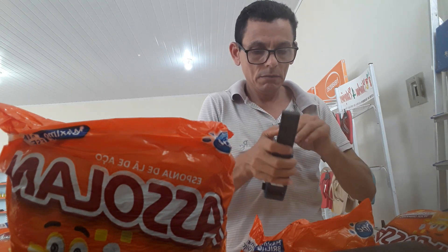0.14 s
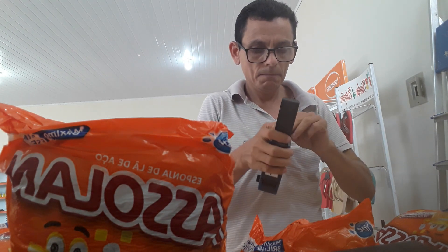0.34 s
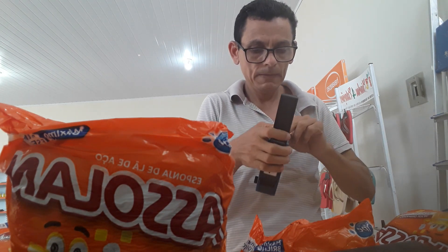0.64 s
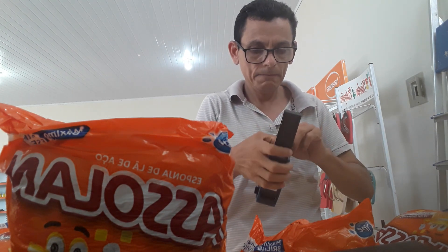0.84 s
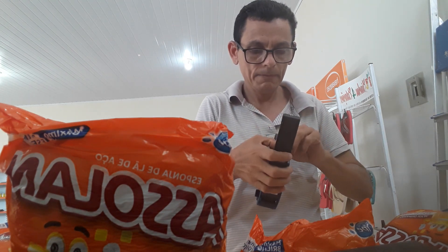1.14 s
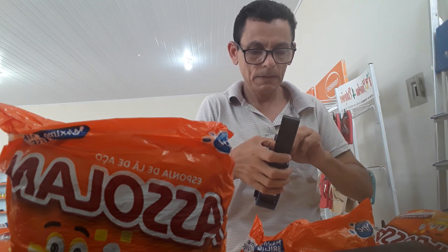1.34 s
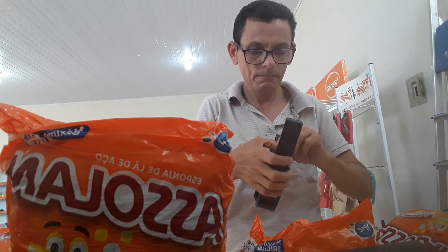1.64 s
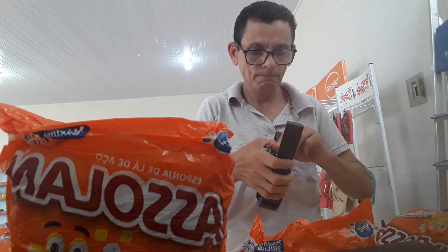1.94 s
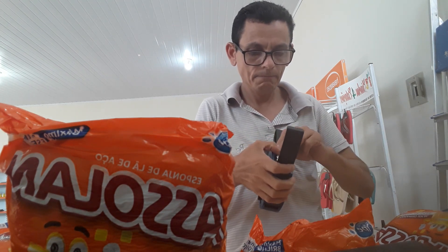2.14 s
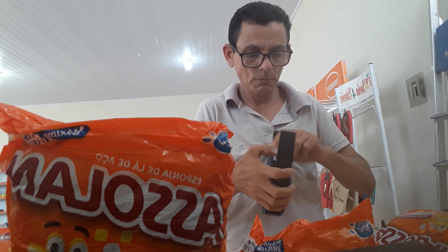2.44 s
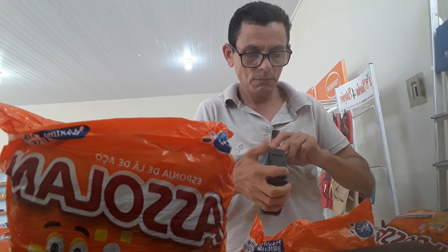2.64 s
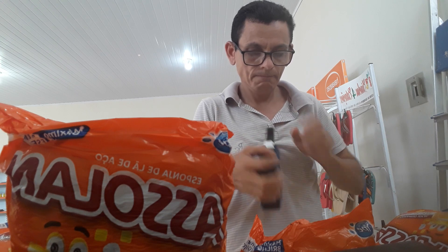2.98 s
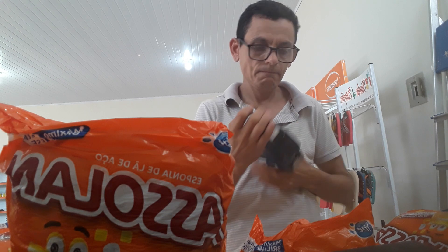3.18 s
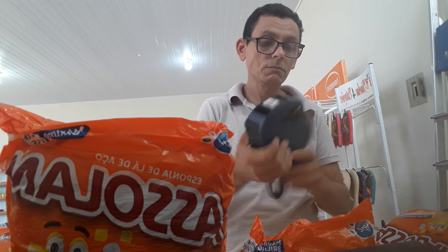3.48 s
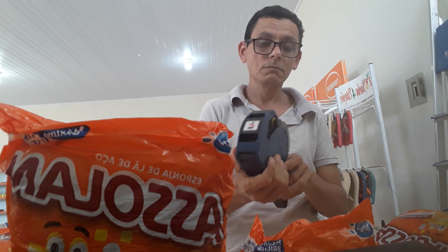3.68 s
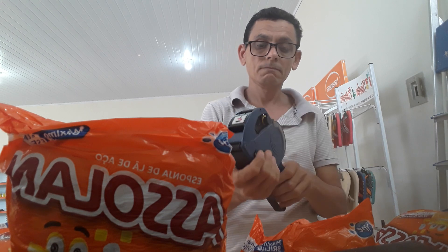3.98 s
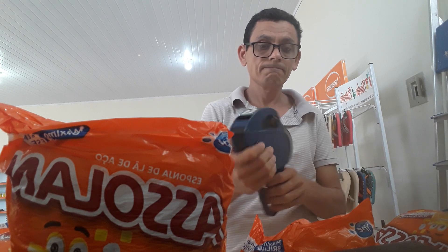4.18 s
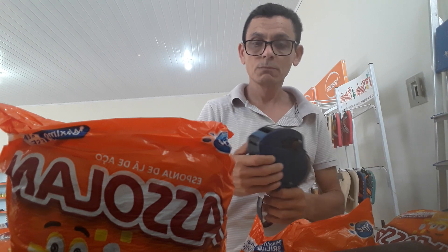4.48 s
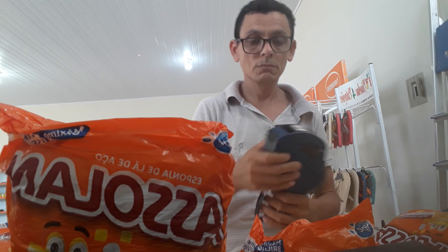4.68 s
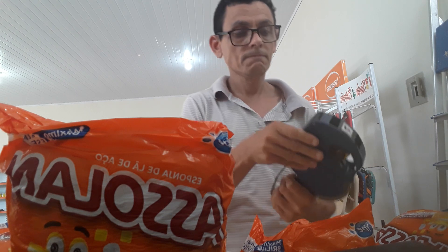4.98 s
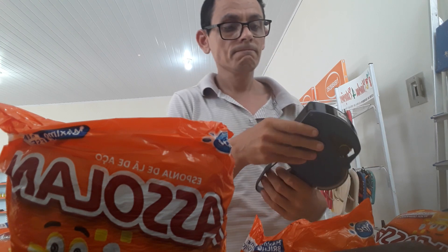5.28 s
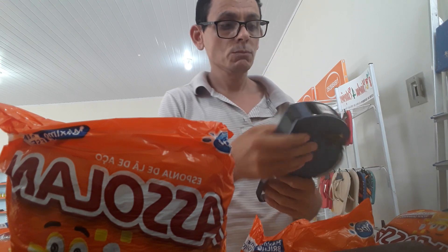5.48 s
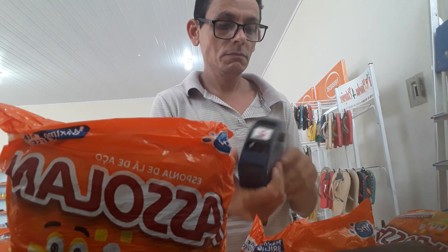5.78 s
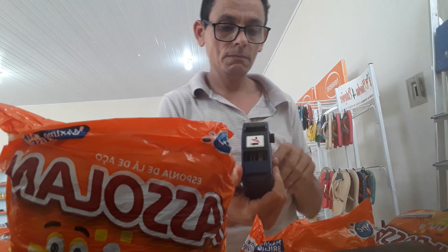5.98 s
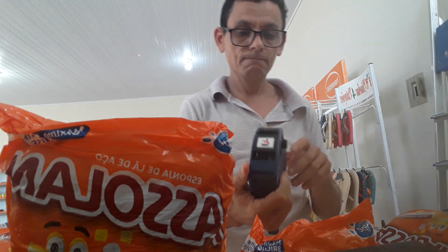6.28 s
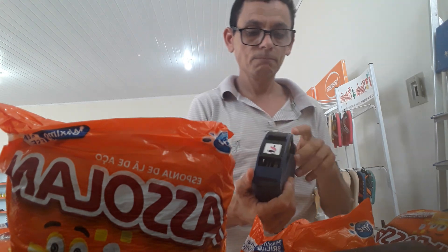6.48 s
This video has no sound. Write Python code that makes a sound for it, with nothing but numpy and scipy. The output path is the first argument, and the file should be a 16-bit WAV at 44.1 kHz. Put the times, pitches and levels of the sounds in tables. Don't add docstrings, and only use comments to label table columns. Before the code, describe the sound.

Small plastic clicks and scrapes, a hard cover slam, a sharp trigger clack and spring-back, over street rumble, sparrows and a nearing vehicle.

```python
import sys
import numpy as np
from scipy import signal
from scipy.fft import rfft, irfft, next_fast_len
from scipy.io import wavfile
from scipy.ndimage import uniform_filter1d, map_coordinates

SR = 44100
rng = np.random.default_rng(int(sys.argv[2]) if len(sys.argv) > 2 else 0)


def materialize(psi):
    bounded = np.clip(np.atleast_2d(psi).T, -1, 1)
    quanta = np.round(bounded * 32767).astype(np.int16)
    wavfile.write(sys.argv[1], SR, quanta)


def invert_db(x):
    u = np.asarray(x, float) / 20
    return 10 ** u


N = 292030


def unit(x):
    return x / np.sqrt(np.mean(x ** 2) + 1e-20)


def along(points, hz):
    f, v = np.transpose(points)
    return np.interp(np.log(hz + 1), np.log(f + 1), v)


def curves(rows):
    s, *cols = np.transpose(rows)
    return [np.interp(np.arange(N) / SR, s, c) for c in cols]


def wobble(rate_hz):
    knots = rng.standard_normal(int(N * rate_hz / SR) + 4)
    return map_coordinates(knots, [np.arange(N) * rate_hz / SR])


def filtered(x, response):
    m = next_fast_len(len(x) + 4096)
    spectrum = rfft(x, m) * response(np.fft.rfftfreq(m, 1 / SR))
    return irfft(spectrum, m)[:len(x)]


def resonances(modes):
    def response(f):
        total = 0
        for k, (hz, width_hz, db) in enumerate(modes):
            damping = 1j * f * width_hz
            total = total + (-1) ** k * invert_db(db) * damping / (hz * hz - f * f + damping)
        return total
    return response


def steep(modes):
    return lambda f: resonances(modes)(f) ** 2


def damped(modes):
    return lambda f: resonances(modes)(f) / (1 + 1j * f / 9000) ** 2


def rush(spectrum, patchy_db):
    z = signal.stft(rng.standard_normal(N), nperseg=512)[2]
    field = uniform_filter1d(rng.standard_normal(z.shape), size=5, axis=0)
    field = uniform_filter1d(field, size=14, axis=1)
    x = signal.istft(z * invert_db(patchy_db * unit(field)), nperseg=512)[1][:N]
    return unit(filtered(x, lambda hz: invert_db(along(spectrum, hz))))


def swells(table, attack, release, fade_db):
    rows = []
    for start_s, long_s, first_hz, last_hz, db in table:
        end_s = start_s + long_s
        rows.append((start_s - 0.004, first_hz, -120))
        for share, drop_db in [(0, fade_db), (attack, 0), (1 - release, 0), (1, fade_db)]:
            rows.append((start_s + share * long_s, first_hz + share * (last_hz - first_hz), db - drop_db))
        rows.append((end_s + 0.004, last_hz, -120))
    return rows


def tone(rows, blur_hz, rate_hz):
    hz, db = curves(rows)
    phase = 2 * np.pi * np.cumsum(hz + blur_hz * wobble(rate_hz)) / SR
    return np.sqrt(2) * invert_db(db), phase


# time in seconds, swell in dB.
TRAFFIC_SWELL = [(0, 2), (.25, 3), (.6, 2), (1.4, 1), (1.65, 1), (1.95, 2), (2.4, 1.5), (2.7, 5), (3.75, 6),
                 (4.45, 7.5), (4.9, 10), (5.4, 11), (5.6, 12.5), (6.2, 15), (6.46, 19), (6.62, 20.5)]
# frequency in Hz, density in dB per Hz.
RUMBLE_SPECTRUM = [(18, -57), (30, -19), (65, -1), (102, -0.5), (172, 0.5), (209, -2), (243, -1.5),
                   (280, -14), (400, -22), (520, -17), (880, -120)]
ROAR_SPECTRUM = [(150, -13), (250, -1), (279, -1.5), (788, -4.5), (1230, -8), (1370, -9.5), (1950, -17),
                 (3500, -18), (4550, -31), (7700, -120)]
HISS_SPECTRUM = [(1470, -5), (2500, 2), (2880, 0), (3630, -4), (3980, -2.5), (6760, -4), (8660, -12.5),
                 (9440, -32.5), (11300, -15), (16000, -40)]
# frequency in Hz, density in dB per Hz.
SPRAY_SPECTRUM = [(6000, -30), (8500, -1), (11500, 0), (14000, -11), (16000, -10)]
# centre in Hz, width in Hz, level in dB.
TREAD_MODES = [(1031, 52, -2), (1254, 78, 0.5), (1678, 145, -5), (2000, 85, -0.5), (2290, 90, -6.5),
               (2950, 90, -9)]


def street():
    swell_db, = curves(TRAFFIC_SWELL)
    rumble_db = -58 + 0.66 * np.minimum(swell_db, 16.5)
    roar_db = -64 + 0.97 * swell_db
    tread_db = -74.5 + 1.697 * swell_db
    hiss_db = -71.5 + swell_db + 0.018 * swell_db ** 2
    spray_db = -118 + 2.9 * swell_db

    rumble = invert_db(rumble_db + 0.8 * wobble(4.8)) * rush(RUMBLE_SPECTRUM, patchy_db=1.57)
    roar = invert_db(roar_db + 0.88 * wobble(8.1)) * rush(ROAR_SPECTRUM, patchy_db=1.97)
    flat = rush([(100, 0), (9000, 0)], patchy_db=0.5)
    tread = invert_db(tread_db) * unit(filtered(flat, resonances(TREAD_MODES)))
    hiss = invert_db(hiss_db) * rush(HISS_SPECTRUM, patchy_db=0.6)
    spray = invert_db(spray_db) * rush(SPRAY_SPECTRUM, patchy_db=1.1)
    return rumble + roar + tread + hiss + spray


# time in seconds (the bump peaks 0.04 s later), peak in dB, pitch in
# Hz.
THUDS = [(.62, -63, 45), (.88, -54, 50), (2.04, -50.5, 60)]


def thuds():
    t = np.arange(N) / SR
    out = np.zeros(N)
    for s, db, hz in THUDS:
        bump = np.exp(-((t - s - 0.04) / 0.054) ** 2)
        out += invert_db(db) * np.sin(2 * np.pi * hz * t) * bump
    return out


# start in seconds, length in seconds, first Hz, last Hz, level in dB.
BRAKE_TONES = [(.74, .71, 732, 725, -65)]
GEAR_TONES = [(4.1, 0.784, 1973, 2005, -63.5)]
HUM_TONES = [(.33, 0.155, 478, 474, -64.5), (.6, 0.79, 450, 446, -68)]
FAR_ENGINE_TONES = [(2.2, 0.92, 71, 69.7, -57), (3.31, .58, 69.4, 70.5, -56), (3.92, 0.36, 73.6, 72.5, -54),
                    (4.4, 0.42, 71, 72.5, -61), (5.1, 0.25, 72.2, 71.5, -65)]
NEAR_ENGINE_TONES = [(6.33, 0.44, 123.5, 120.2, -51)]


def machines():
    level, phase = tone(swells(BRAKE_TONES, attack=0.1, release=0.42, fade_db=11), blur_hz=3, rate_hz=22)
    octave = invert_db(-11) * np.sin(2 * phase)
    brake = invert_db(2 * wobble(25) - 1.5) * level * (np.sin(phase) + octave)

    level, phase = tone(swells(GEAR_TONES, attack=0.35, release=0.08, fade_db=11), blur_hz=45, rate_hz=130)
    gear = invert_db(2 * wobble(30) - 1.5) * level * np.sin(phase)

    level, phase = tone(swells(HUM_TONES, attack=0.45, release=0.75, fade_db=5), blur_hz=11, rate_hz=40)
    hum = level * np.sin(phase)

    level, phase = tone(swells(FAR_ENGINE_TONES, attack=0.2, release=0.2, fade_db=8), blur_hz=1.5, rate_hz=10)
    far = invert_db(-4) * level * np.sin(phase)

    level, phase = tone(swells(NEAR_ENGINE_TONES, attack=0.22, release=0.1, fade_db=15),
                        blur_hz=2.3, rate_hz=12)
    near = level * (np.sin(phase) + invert_db(-4.5) * np.sin(2 * phase))
    return brake + gear + hum + far + near


# frequency in Hz, t60 in seconds.
SHOP_T60 = [(300, 1), (1000, 0.9), (3000, 0.95), (6000, 0.71), (10000, 0.6), (16000, 0.37)]


def shop(x):
    hz, t, z = signal.stft(rng.standard_normal(SR * 2 // 3), SR, nperseg=256)
    decay = invert_db(-60 * t / along(SHOP_T60, hz)[:, None])
    tail = signal.istft(z * decay, SR, nperseg=256)[1]
    tail = tail * (1 - np.exp(-np.arange(len(tail)) / (0.016 * SR)))
    return signal.fftconvolve(x, tail / np.linalg.norm(tail))


# start in seconds, length in seconds, first Hz, slide in Hz per second, level in dB.
SPARROW_NOTES = [(0.176, 0.062, 4950, -4000, -73), (0.229, 0.059, 4500, -15000, -67),
                 (1.58, 0.055, 4620, -2500, -78.5), (1.885, 0.047, 4750, -3000, -63),
                 (1.927, .065, 4184, -11000, -63.5), (3.795, 0.044, 4650, -1500, -74),
                 (4.172, 0.0377, 4140, 13000, -68), (4.207, 0.065, 4480, -19000, -67.5),
                 (6.17, .04, 4300, 9000, -61), (6.22, .055, 4500, -12000, -67)]


def sparrows():
    notes = [(s, long_s, hz, hz + slide * long_s, db) for s, long_s, hz, slide, db in SPARROW_NOTES]
    level, phase = tone(swells(notes, attack=0.5, release=0.25, fade_db=9), blur_hz=230, rate_hz=600)
    dry = invert_db(2.5 * wobble(90)) * level * np.sin(phase)
    return invert_db(6.5) * dry + invert_db(1) * shop(dry)[:N]


# centre in Hz, width in Hz, level in dB.
CASING_MODES = [(1940, 475, -1), (2900, 337, 1.5), (4500, 2380, -2), (6000, 1300, 3.5), (7230, 2130, 0)]
RIM_MODES = [(10930, 1760, 5.5), (14600, 770, -1.5)]
BODY_MODES = [(282, 970, 0)]


def contacts(table, hollow, hollow_db, casing_db, width, rim_db, rise_s, room_db,
             settle_db_per_ms=0, jolt_db=-60):
    out = np.zeros(N + 2 * SR)
    t = np.arange(SR // 8) / SR
    blow = 1.0 * (t == 0)
    responses = (steep(hollow), damped(CASING_MODES), resonances(RIM_MODES), steep(BODY_MODES))
    parts = [filtered(blow, response) for response in responses]
    for s, db, ring_hz, t60_s in table:
        loose = filtered(blow, steep([(ring_hz, width * ring_hz, 0)]))
        paths = [loose] + parts

        spikes = invert_db(4.75 * rng.standard_normal(len(t)))
        rattle = rng.standard_normal((len(paths), len(t))) * spikes
        crack = 1 + 4.2 * invert_db(-60 * t / 0.0014)
        decay = invert_db(-60 * t / max(t60_s, 0.004))
        rattle = rattle * crack * decay * (1 - np.exp(-t / rise_s))

        seated_db = hollow_db + settle_db_per_ms * 1000 * (s - table[0][0])
        shares = invert_db([[0], [seated_db], [casing_db], [casing_db + rim_db], [seated_db + jolt_db]])
        rings = signal.fftconvolve(rattle, paths, axes=1)[:, :len(t)]
        rings = rings * shares / np.abs(rings).max(axis=1, keepdims=True)
        rings = rings * invert_db(db) / np.abs(rings.sum(axis=0)).max()

        spread = invert_db([-8, 1, 1, -1, 0])
        to_walls = np.zeros(len(t))
        for gain, path, ring in zip(spread, paths, rings):
            to_walls += gain * path * np.linalg.norm(ring) / np.linalg.norm(path)
        tail = invert_db(room_db) * shop(to_walls)

        start = round(s * SR)
        out[start:][:len(t)] += rings.sum(axis=0)
        out[start:][:len(tail)] += tail
    return out[:N]


# centre in Hz, width in Hz, level in dB.
CHAMBER_MODES = [(876, 474, -3.5), (1016, 99, 4), (1133, 144, -2), (1390, 290, -7)]
# start in seconds, peak in dB, ring of the loose part in Hz, t60 in seconds.
KNOCKS = [(0.2382, -37.5, 1650, 0.025), (0.2388, -44, 2780, 0.062), (1.8457, -48, 1960, .023),
          (2.3141, -40, 2300, 0.077), (2.3294, -52, 2100, .03), (2.4972, -45.5, 1860, 0.018),
          (2.6184, -48, 1956, 0.023), (3.2855, -32.5, 1840, .045), (3.4656, -39.5, 1990, 0.039),
          (3.5557, -34.5, 2110, 0.032), (4.78, -45, 2000, .039)]


def fingers():
    return contacts(KNOCKS, CHAMBER_MODES, hollow_db=-11.5, casing_db=-12, width=0.38, rim_db=-18,
                    rise_s=0.00028, room_db=-3.5)


# start in seconds, peak in dB, ring of the loose part in Hz, t60 in seconds.
TICKS = [(0.478, -57, 5560, .03), (0.8629, -56, 6240, .03), (1.1488, -57, 4000, .037),
         (1.186, -50, 7070, .026), (1.8235, -45, 11900, 0.036), (2.2794, -58, 7800, 0.027),
         (3.226, -38, 8370, 0.026), (3.5147, -45, 6800, 0.03), (4.945, -23, 6000, 0.026),
         (4.947, -17.5, 6000, 0.083), (5.572, -52, 8240, .03)]
SNICKS = [
    (1.045, -53, 5740, .02),
    (1.2498, -41, 7800, 0.06),
    (1.3514, -35, 7260, 0.038),
    (1.4207, -44.5, 4020, .037),
    (1.4386, -48.5, 4200, 0.035),
    (1.5693, -49, 4760, 0.033),
    (2.888, -19, 2650, 0.037),
    (3.5496, -41, 7600, .03),
    (4.589, -46.5, 7900, .028),
]


def ticks():
    soft = contacts(TICKS, CHAMBER_MODES, hollow_db=-21.5, casing_db=-1.5, width=0.36, rim_db=-16,
                    rise_s=0.00058, room_db=-2)
    sharp = contacts(SNICKS, CHAMBER_MODES, hollow_db=-10, casing_db=7, width=0.2, rim_db=-8.5,
                     rise_s=0.00026, room_db=-10.5)
    return soft + sharp


# start in seconds, peak in dB, ring of the loose part in Hz, t60 in seconds.
BUMPS = [
    (2.582, -39, 2160, 0.068),
    (3.436, -29.5, 1670, .062),
    (3.5717, -29.5, 1845, .09),
    (3.5978, -35, 2050, 0.1),
]
SCRAPES = [(2.4718, -47.5, 7260, 0.18), (2.4886, -48, 4620, 0.068), (2.7608, -30, 5570, 0.069),
           (2.8455, -32, 7200, 0.13), (3.59, -48, 7550, 0.053), (3.6198, -45.5, 3900, .049),
           (4.7594, -49.5, 5770, 0.19), (5.704, -41.5, 5800, 0.11), (5.8785, -44, 6070, 0.041),
           (5.9958, -43, 5000, 0.055), (6.1433, -46, 4170, 0.054)]


def roll():
    bumps = contacts(BUMPS, CHAMBER_MODES, hollow_db=-6.5, casing_db=-2, width=0.23, rim_db=-19,
                     rise_s=0.00057, room_db=-9.5)
    scrapes = contacts(SCRAPES, CHAMBER_MODES, hollow_db=-10, casing_db=1.8, width=0.48, rim_db=-13.5,
                       rise_s=0.00053, room_db=-8.5)
    return bumps + scrapes


# start in seconds, peak in dB, ring of the loose part in Hz, t60 in seconds.
UNLATCH = [
    (2.6575, -20, 6440, .039),
    (2.667, -22.5, 4800, 0.043),
    (2.684, -32, 6400, 0.026),
]
COVER_SLAM = [
    (2.8898, -9.5, 2860, 0.015),
    (2.892, -7, 7110, 0.037),
    (2.896, -14.5, 7180, .027),
    (2.9015, -12.5, 5900, 0.042),
    (2.909, -23, 7100, 0.047),
]
CATCH = [
    (3.2402, -18.5, 2900, 0.0067),
    (3.2424, -23, 2950, .022),
    (3.2435, -22.5, 6470, 0.015),
    (3.249, -25.5, 4540, .04),
]


def cover():
    unlatch = contacts(UNLATCH, CHAMBER_MODES, hollow_db=-10.5, casing_db=3.5, width=0.16, rim_db=-8.5,
                       rise_s=0.00045, room_db=-10)
    slam = contacts(COVER_SLAM, CHAMBER_MODES, hollow_db=-7, casing_db=2, width=0.2, rim_db=-4.5,
                    rise_s=0.00017, room_db=-8.5, settle_db_per_ms=0.24, jolt_db=-15)
    catch = contacts(CATCH, CHAMBER_MODES, hollow_db=-24, casing_db=1.5, width=0.11, rim_db=-24,
                     rise_s=0.00023, room_db=-9.5, settle_db_per_ms=0.95, jolt_db=5)
    return unlatch + slam + catch


# centre in Hz, width in Hz, level in dB.
GRIP_MODES = [(480, 290, -10.5), (970, 580, -2), (1277, 510, -2)]
# start in seconds, peak in dB, ring of the loose part in Hz, t60 in seconds.
PULL = [
    (4.9485, -12.5, 2900, 0.017),
    (4.954, -15, 2570, 0.059),
    (4.9625, -13, 4670, 0.078),
]
STOP = [
    (4.9712, -8, 5740, 0.025),
    (4.973, -6, 2150, 0.05),
    (4.9748, -7, 5700, 0.023),
    (4.9785, -9, 7240, 0.072),
    (4.9874, -12, 6650, 0.024),
]
SPRING_BACK = [
    (5.1195, -16.5, 1600, .022),
    (5.125, -29.5, 4000, .02),
]


def trigger():
    pull = contacts(PULL, GRIP_MODES, hollow_db=-25, casing_db=6, width=0.082, rim_db=-5,
                    rise_s=0.00027, room_db=-4, settle_db_per_ms=1.24, jolt_db=-6)
    stop = contacts(STOP, GRIP_MODES, hollow_db=-4, casing_db=6.5, width=0.2, rim_db=-10.5,
                    rise_s=0.00042, room_db=-11.5, settle_db_per_ms=0.1, jolt_db=-14)
    back = contacts(SPRING_BACK, GRIP_MODES, hollow_db=-9, casing_db=-10, width=0.16, rim_db=-10,
                    rise_s=0.002, room_db=-12)
    return pull + stop + back


def scene():
    outside = street() + thuds() + machines() + sparrows()
    gun = fingers() + ticks() + roll() + cover() + trigger()
    return (outside + gun)[None]


def band_limit(x):
    return signal.sosfilt(signal.butter(12, 16800, fs=SR, output="sos"), x)


# frequency in Hz, gain in dB.
PORT_GAIN = [(8000, -0.5), (9500, 0), (11000, -3), (15500, 1.5)]
# frequency in Hz, density in dB per Hz.
SELF_NOISE_SPECTRUM = [(1180, -26), (2000, -50), (2180, 13), (2620, -22.5), (7060, -16), (9410, -0.5),
                       (13400, 6.5), (15100, 6), (16000, 4)]


def record(dry):
    top_hz, leak_db = 16050, -22
    heard = filtered(dry[0], lambda hz: invert_db(along(PORT_GAIN, hz)))
    heard = heard + invert_db(-75) * rush(SELF_NOISE_SPECTRUM, patchy_db=-2)
    heard = filtered(heard, lambda hz: np.where(hz < top_hz, 1, invert_db(leak_db) * (hz < 1.05 * top_hz)))
    return band_limit(heard[None])


dry = scene()
out = record(dry)
materialize(out)
```